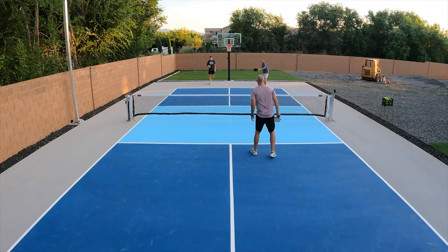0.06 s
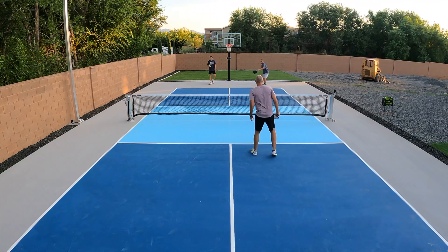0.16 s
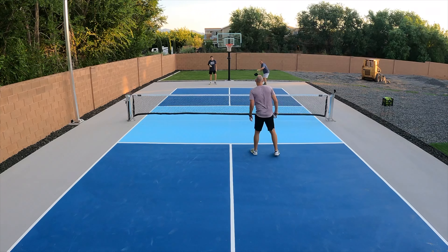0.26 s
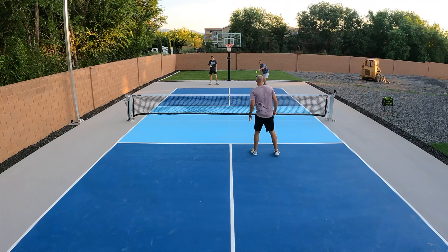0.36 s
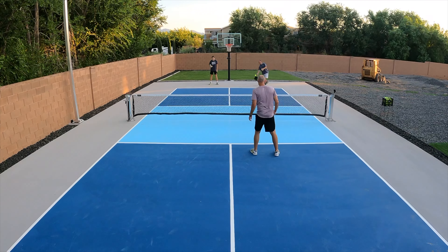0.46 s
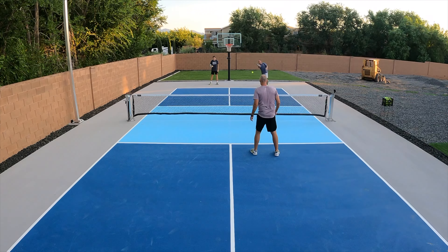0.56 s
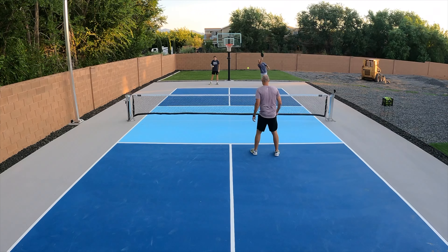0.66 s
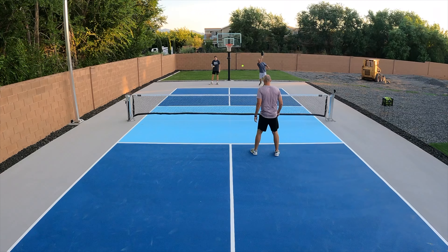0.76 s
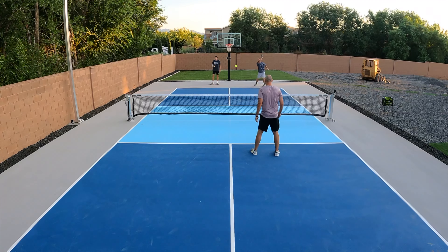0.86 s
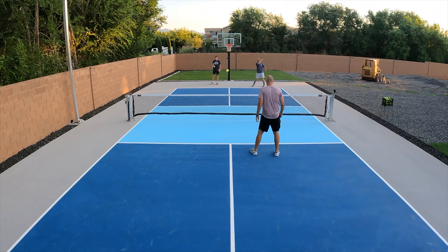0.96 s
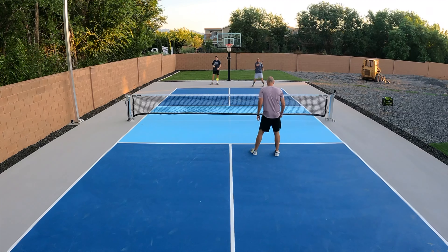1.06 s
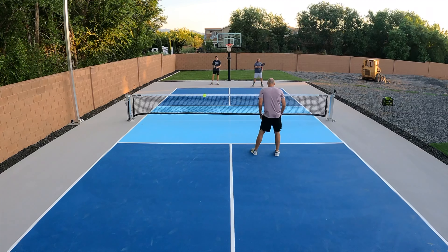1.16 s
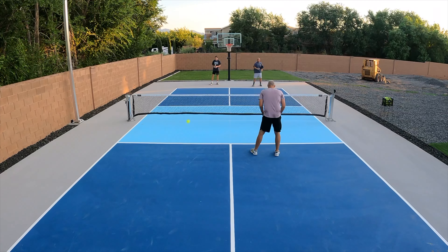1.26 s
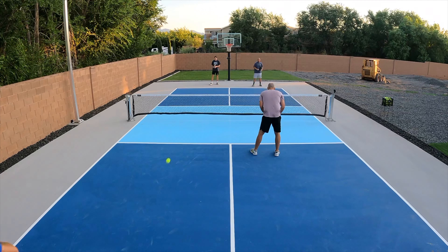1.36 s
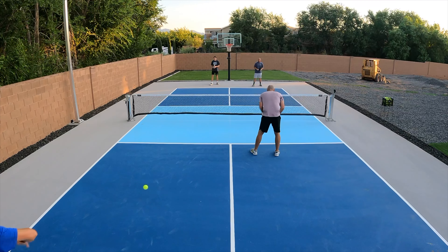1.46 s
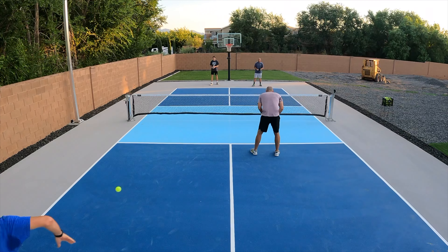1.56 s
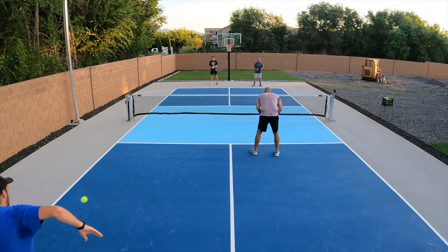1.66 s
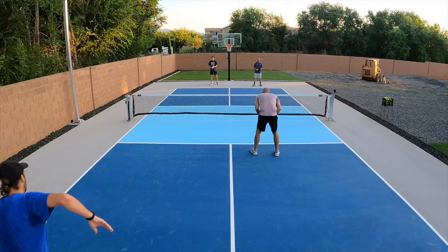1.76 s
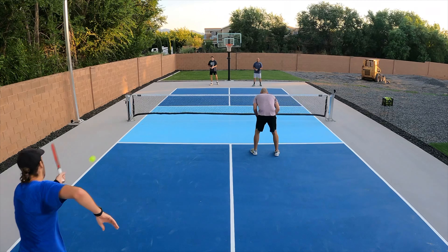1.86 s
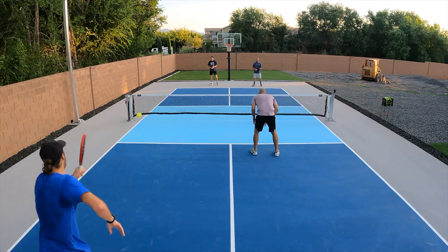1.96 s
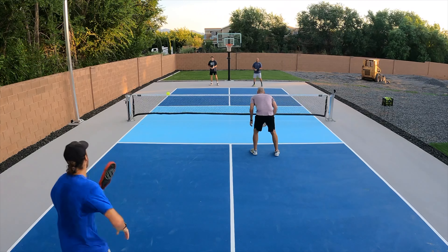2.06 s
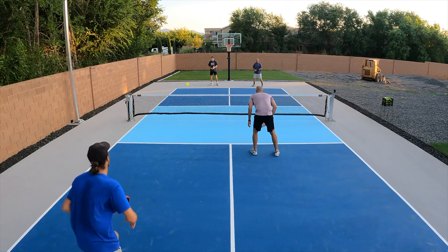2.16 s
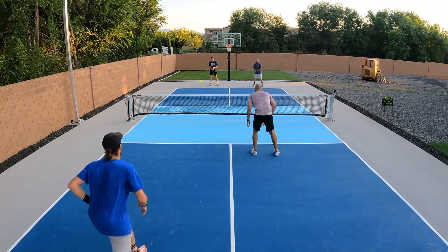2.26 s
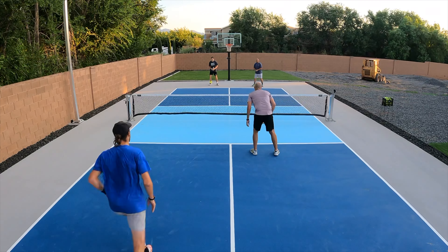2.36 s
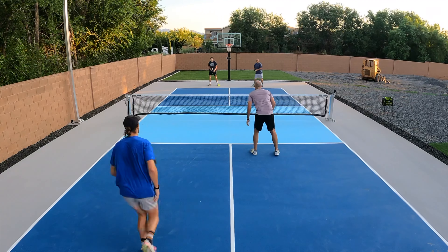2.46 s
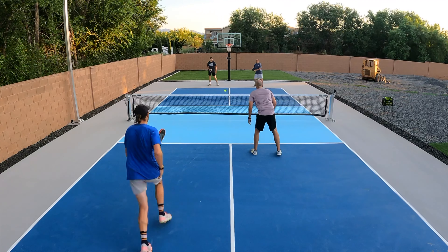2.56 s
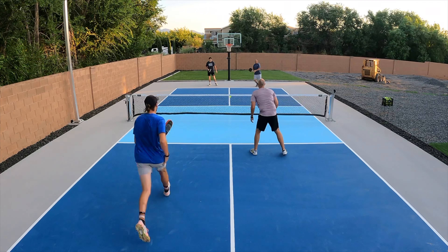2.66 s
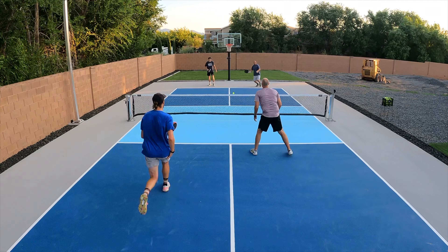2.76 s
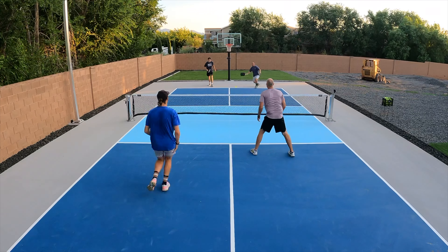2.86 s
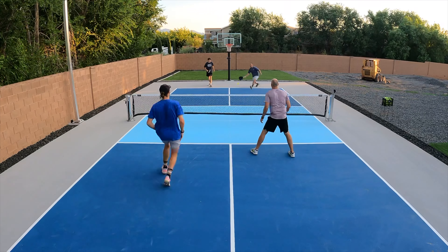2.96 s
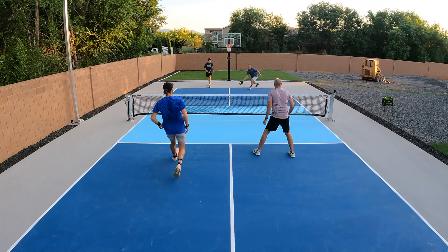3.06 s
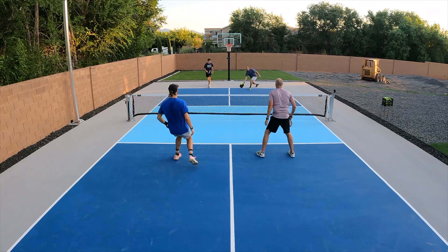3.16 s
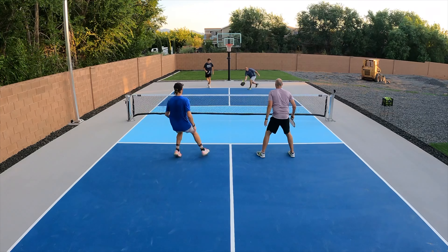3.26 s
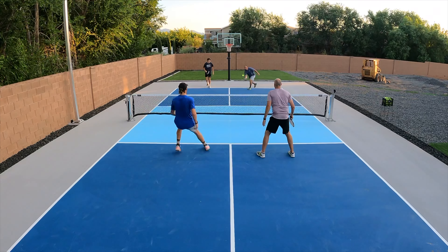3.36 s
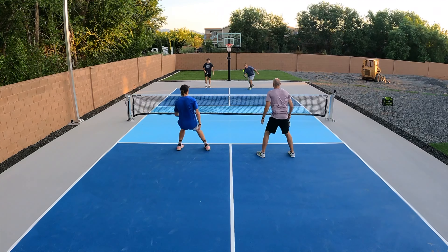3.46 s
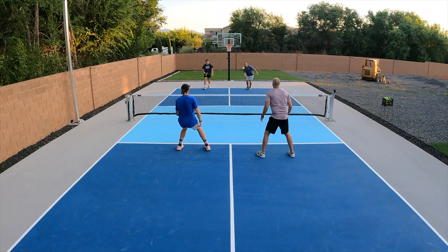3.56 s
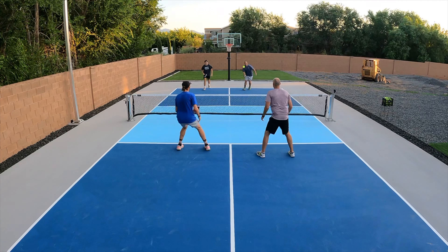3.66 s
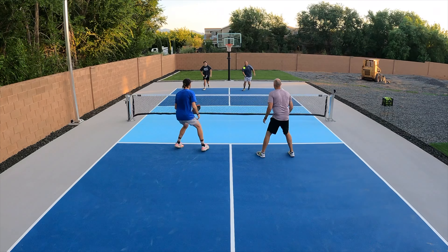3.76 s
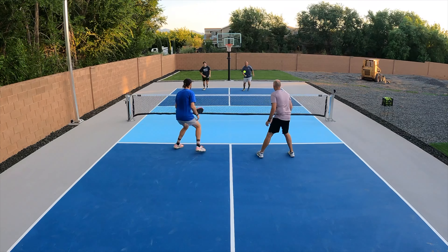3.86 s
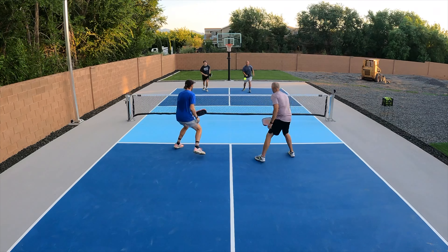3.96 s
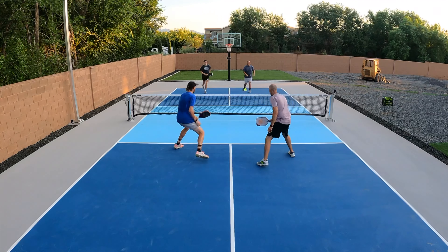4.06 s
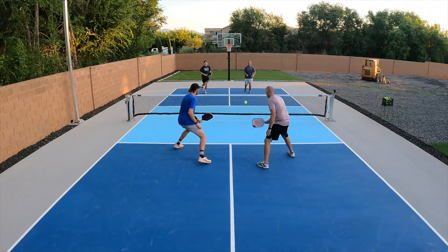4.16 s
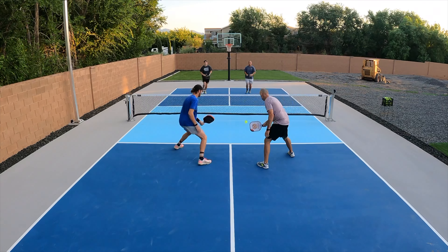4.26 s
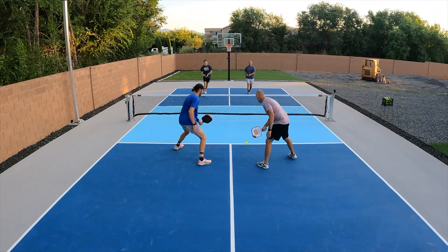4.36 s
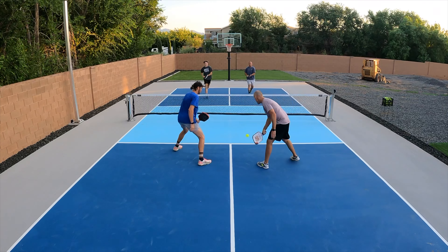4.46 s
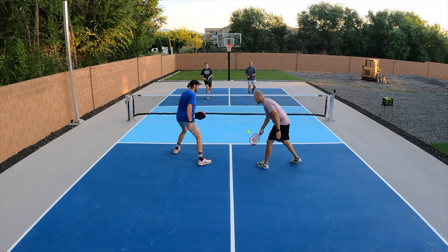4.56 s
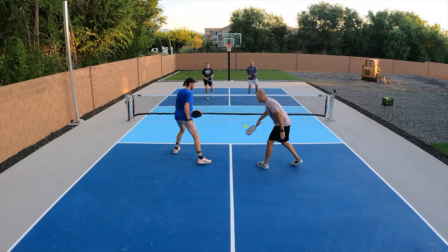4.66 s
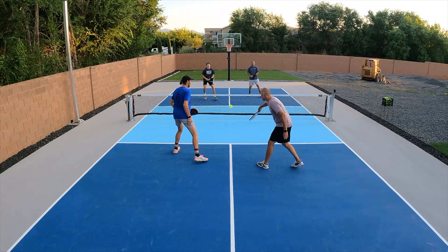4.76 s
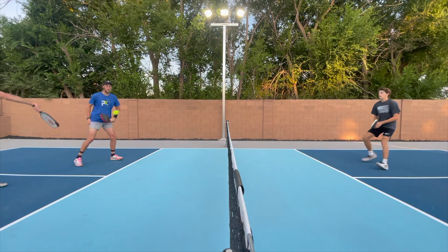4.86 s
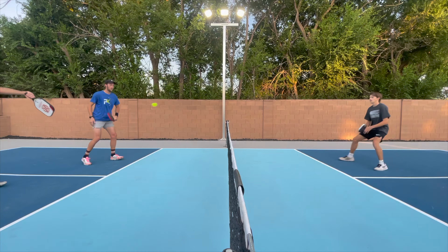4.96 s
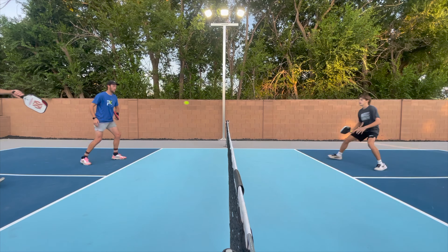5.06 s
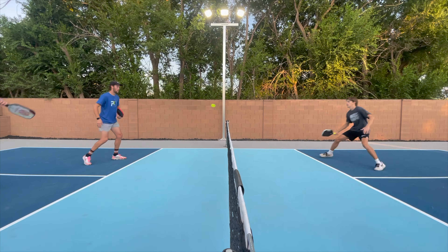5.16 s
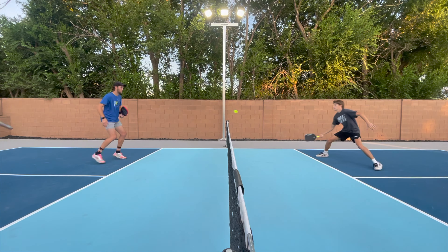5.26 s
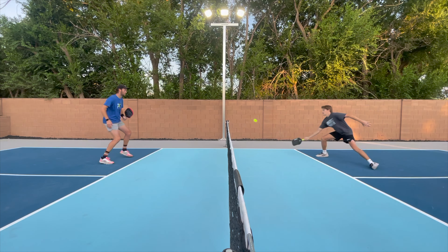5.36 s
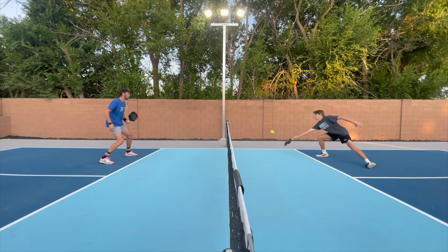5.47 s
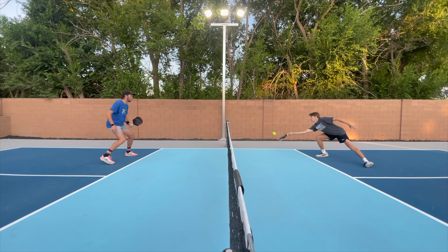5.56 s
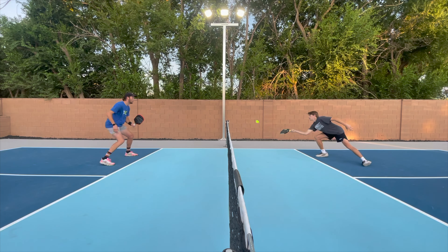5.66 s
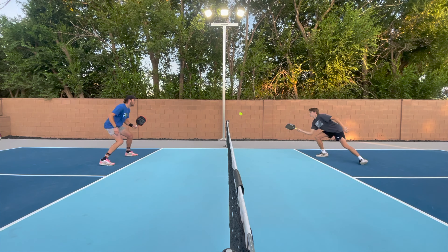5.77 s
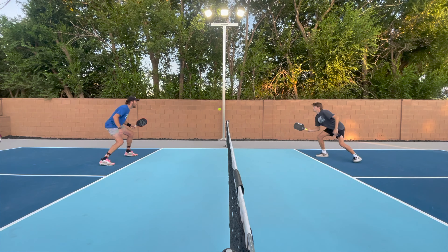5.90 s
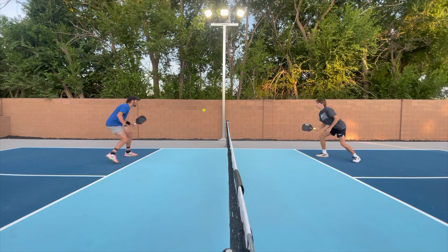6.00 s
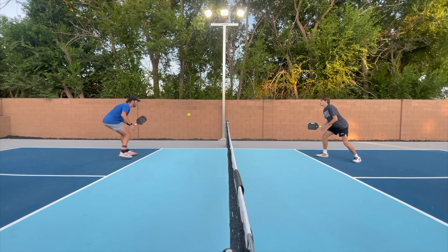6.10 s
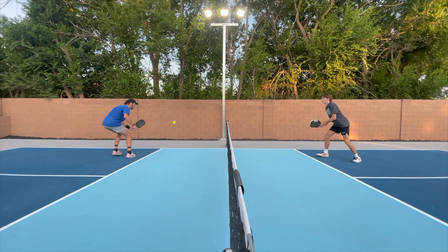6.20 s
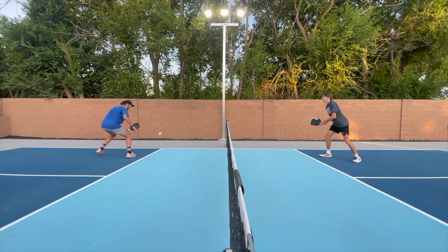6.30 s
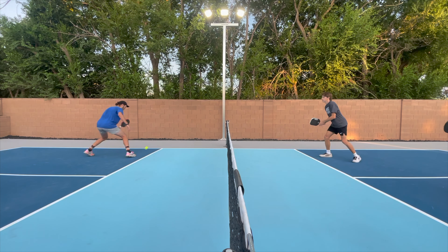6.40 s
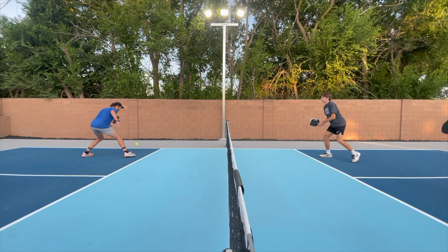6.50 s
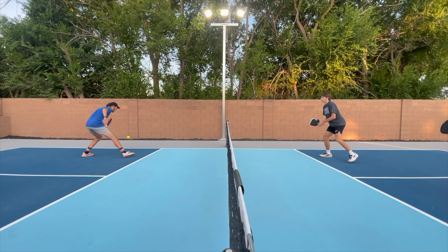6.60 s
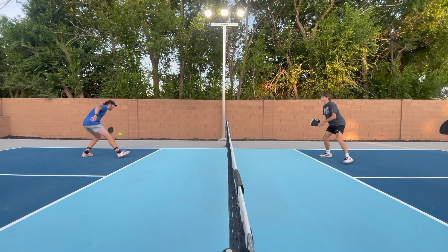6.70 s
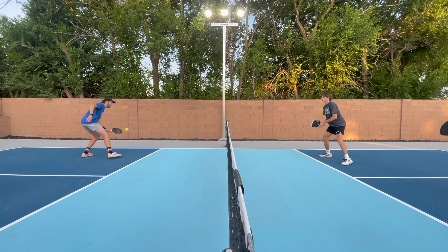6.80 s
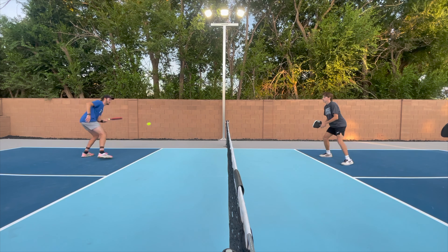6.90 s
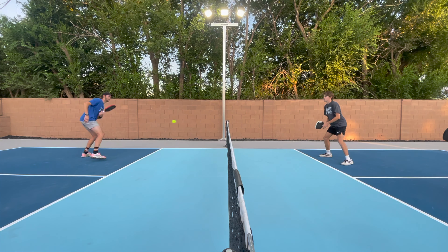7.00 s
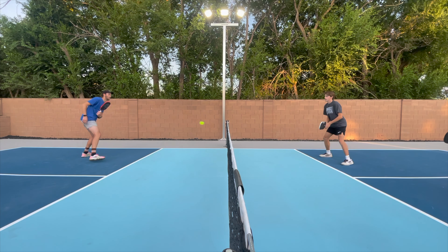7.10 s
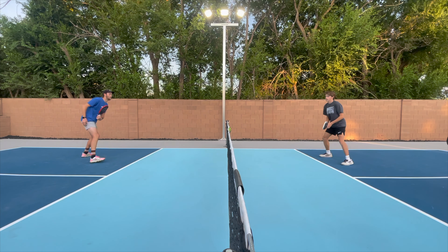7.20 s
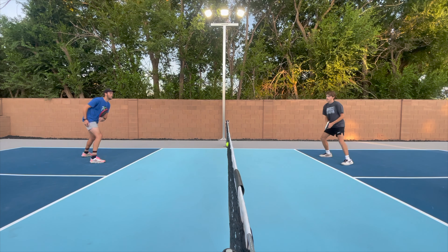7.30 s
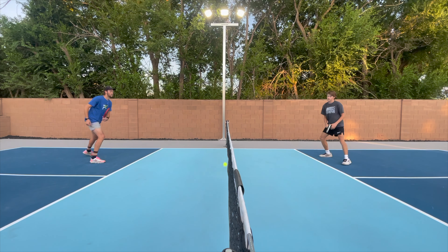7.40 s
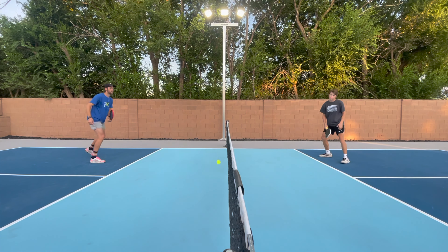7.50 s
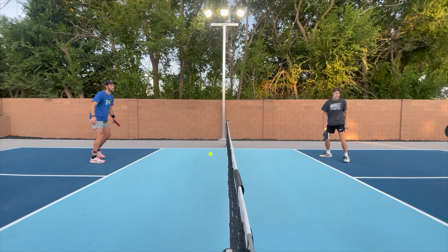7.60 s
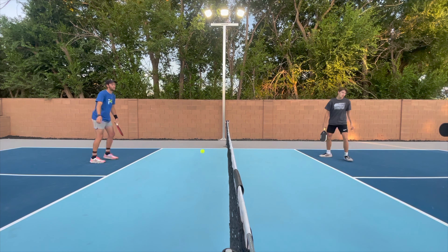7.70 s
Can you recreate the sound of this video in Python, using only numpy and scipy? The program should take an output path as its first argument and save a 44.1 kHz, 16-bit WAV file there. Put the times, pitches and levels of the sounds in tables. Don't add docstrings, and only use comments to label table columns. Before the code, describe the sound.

Hollow plastic ball struck by stiff paddles on a hard court, irregularly spaced: bright pop, dry bounce, very loud crack, later clacks and woodier strikes, ending in small bounces. Rubber soles shuffle, scrape and chirp, most loudly before the final hit. Walls and houses return quick slaps and a short ringing tail. Distant engines hum softly. Courtside stereo pickup, leaning slightly left, with the treble opening up partway through.

```python
import sys
import numpy as np
from scipy import signal
from scipy.fft import rfft, irfft, next_fast_len
from scipy.io import wavfile
from scipy.ndimage import uniform_filter1d

SR = 44100
rng = np.random.default_rng(int(sys.argv[2]) if len(sys.argv) > 2 else 0)


def boost_factor(decibels):
    exponent = np.asarray(decibels, float) / 20
    return 10 ** exponent


def transcribe(u):
    v = np.clip(np.atleast_2d(u).T, -1, 1)
    q = np.round(v * 32767).astype(np.int16)
    wavfile.write(sys.argv[1], SR, q)


N = 341422
CONTACT_S = 0.0007

# (frequency [Hz], level [dB])
SOLE_COLOUR = [(300, 3), (1000, 12.5), (2000, 8), (4000, 6), (7500, -1), (9000, -22), (16000, -69)]
# (frequency [Hz], level [dB])
GRIT_COLOUR = [(6000, -1), (8500, -1), (12500, 1), (14000, 1.5), (16500, 4)]


def evened(x):
    return x / np.sqrt(np.mean(x ** 2) + 1e-20)


def peaked(x):
    return x / (abs(x).max() + 1e-12)


def read(points, hz):
    f, value = np.transpose(points)
    return np.interp(np.log(hz + 1), np.log(f + 1), value)


def add(mix, s, sound):
    part = mix[:, round(s * SR):][:, :sound.shape[1]]
    part += sound[:, :part.shape[1]]


def pair(length, same):
    left, other = rng.standard_normal((2, length))
    return np.array([left, same * left + np.sqrt(1 - same ** 2) * other])


def coloured(x, db):
    size = next_fast_len(x.shape[-1], True)
    hz = np.fft.rfftfreq(size, 1 / SR)
    return irfft(rfft(x, size) * boost_factor(db(hz)), size)[..., :x.shape[-1]]


def toned(x, points):
    return evened(coloured(x, lambda f: read(points, f)))


def resonate(x, hz, width):
    turn = np.exp(2j * np.pi * np.cumsum(hz * np.ones(x.shape[-1])) / SR)
    r = np.exp(-np.pi * width / SR)
    return 2 * (turn * signal.lfilter([1 - r], [1, -r], x / turn)).real


def steep_resonance(x, hz, width):
    return resonate(resonate(x, hz, width), hz, 1.13 * width)


def rally():
    # (time [s], shell ring [dB], shell pitch [Hz], thump re ring [dB], crack re ring [dB])
    strikes = [
        (1.2, -46, 930, 16, -9.5),
        (0.621, -6, 2044, 0, -6),
        (1.8857, -0.5, 1260, -14, -4),
        (2.45, -36.5, 850, 3, -19),
        (4.218, -25.5, 904, 7.5, -18.5),
        (4.7385, -8.5, 936, -5, 3),
        (5.5793, -8.5, 1340, 4, -0.5),
        (6.7895, -6.5, 1550, -5, 0),
        (6.41, -21, 690, 4.5, -31),
        (6.783, -24.5, 1300, 2.5, 3),
    ]
    # (time [s], level [dB], stiffness [x usual bending pitch],
    # thump re level [dB], crack re level [dB])
    clacks = [
        (3.229, -28, 0.98, 7, -17.5),
        (3.344, -8.5, 1.57, 3.5, 0),
        (4.948, -28, 1.1, -1.5, -22),
        (5.5887, -12.5, 1.1, -8.5, 4),
    ]
    # (time [s], level [dB], thump re level [dB], crack re level [dB])
    bounces = [(1.526, -10, -9.5, 1), (2.822, -24, 0.5, 6), (4.451, -18, 3.5, 4), (5.11, -25, -5.5, -13.5),
               (5.351, -18.5, 2, -17), (5.45, -30, 6, -2), (5.558, -19, -1, 1), (6.469, -10, -27.5, -5),
               (7.229, -20.5, -33.5, -2), (7.458, -25, -6, -3), (7.48, -18.5, -22, 0.5)]
    # (time [s], level [dB])
    ticks = [(1.526, -17.5), (4.4507, -9.5), (4.471, -15), (5.5582, -6.5), (5.5704, -29.5), (5.5774, -31),
             (5.657, -28), (5.6695, -27.5), (6.4593, -19), (6.4702, -18), (6.4808, -28), (6.7834, -40),
             (7.208, -28), (7.3981, -37), (7.4572, -17.5), (7.4819, -18), (7.71, -28)]
    ball = np.zeros((2, N))
    for s, *row in strikes:
        add(ball, s + CONTACT_S, knock(*row, focus=0.55, push=direct(ground=0.14)))
    for s, db, stiff, *rest in clacks:
        add(ball, s + CONTACT_S, knock(db, 1460, *rest, focus=0.24, push=direct(ground=0.24), stiff=stiff))
    for s, db, *rest in bounces:
        add(ball, s, knock(db, 1150, *rest, focus=0.064, push=direct(ground=0.12)))
    for s, db in ticks:
        add(ball, s - 64 / SR, tick(db))
    return ball


def knock(ring_db, hz, thump_db, crack_db, focus, push, stiff=1):
    # (frequency [Hz], width [Hz], level [dB])
    shell_modes = [(1000, 77, -8), (1340, 200, -6), (1600, 550, -2), (2026, 280, -18)]
    # (frequency [Hz], width [Hz], level [dB])
    paddle_modes = [(139.7, 63, -6.5), (208.7, 126, -2), (273.6, 138, 3), (418, 168, -3.5),
                    (510.5, 154, -12)]
    # (frequency [Hz], level [dB])
    crack_colour = [(2000, 25.5), (3500, 20), (6000, 17), (9000, 6.5), (12000, -58), (16000, -12.5)]

    near = 0
    for f, width, db in shell_modes:
        away_db = 5.0 * focus * abs(np.log2(f / hz))
        near = near + boost_factor(db - away_db) * peaked(steep_resonance(push, f, width))
    clear = 1.65 * peaked(steep_resonance(push, hz, 213)) + near
    dry_knock = peaked(steep_resonance(push, 1110, 1150))
    shell = focus * clear + (1 - focus) * dry_knock

    bend = push + 3.1 * push.mean(0)
    thump = sum(boost_factor(db) * peaked(steep_resonance(bend, f * stiff, width * stiff))
                for f, width, db in paddle_modes)
    thump = np.roll(thump, round(0.0012 * SR), axis=1)

    rattle = np.where(abs(push) > 0.4, 0, push)
    crack = coloured(push + 2.8 * rattle, lambda f: read(crack_colour, f) - 60 * (f < 1800))
    crack *= signal.windows.tukey(4096, .5)[2048:]
    return -boost_factor(ring_db) * (peaked(shell) + boost_factor(thump_db) * peaked(thump) + boost_factor(crack_db) * peaked(crack))


def direct(ground):
    t = np.arange(2048) / SR
    push = 0.113 * pair(2048, 0.7) * np.exp(-t / 0.0026)
    push[:, 0] += 1
    ground_at = round(0.0036 * SR) + np.array([0, 3])
    push[[0, 1], ground_at] += ground
    return push


def tick(db):
    burst = coloured(np.roll(scattered(0.00073), 64, axis=1), lambda f: read(GRIT_COLOUR, f))
    return boost_factor(db) * peaked(burst * np.hanning(4096)[2048:])


def walls():
    # (time [s], level [dB], shell pitch [Hz], crack re level [dB])
    side_wall = [(0.634, -18, 1050, 7), (0.646, -23, 1100, -12.5), (2.861, -37.5, 788, 5.5),
                 (3.356, -15.5, 1060, 4.5), (3.366, -17.5, 1676, -6), (4.241, -31, 1022, -15),
                 (4.47, -29.5, 1350, 2), (4.758, -24, 950, -4), (5.605, -23, 1310, 1),
                 (6.481, -27.5, 1080, 3), (6.814, -27, 1645, -8), (3.537, -35, 2090, -5)]
    # (time [s], level [dB], shell pitch [Hz], crack re level [dB])
    end_wall = [(0.699, -18.5, 1340, 0.5), (1.544, -26, 930, 1.5), (1.611, -41, 1284, 5),
                (1.905, -14, 1354, -20.5), (2.0365, -13, 1150, -4.5), (2.833, -27, 1170, -1),
                (3.428, -20, 1560, 0.5), (4.871, -21, 1030, -9), (5.685, -21.5, 1410, 1.5),
                (6.803, -12, 1645, -5), (6.922, -27, 1070, -7.5), (7.494, -26, 875, 1)]
    # (time [s], level [dB], shell pitch [Hz])
    houses = [
        (0.861, -30.5, 1080),
        (2.011, -17, 1050),
        (2.058, -17, 1340),
        (2.078, -19.5, 1280),
        (4.806, -28, 980),
        (6.424, -25, 1120),
        (7.243, -35, 1500),
    ]
    # (time [s], frequency [Hz], width [Hz], level [dB])
    pings = [(6.7905, 964, 220, -15), (6.7905, 598, 200, -18), (6.804, 1000, 250, -22),
             (6.811, 300, 200, -14), (4.7395, 1600, 400, -14), (4.7405, 520, 250, -14),
             (4.742, 1500, 500, -15), (4.739, 2800, 1200, -14), (1.8895, 2800, 600, -19),
             (1.887, 250, 150, -13), (3.357, 1700, 300, -21), (3.378, 500, 250, -22),
             (5.581, 1330, 110, -20), (5.581, 1850, 250, -21), (5.59, 2400, 350, -20),
             (5.602, 450, 200, -19), (5.686, 1800, 400, -24), (5.366, 900, 500, -27),
             (7.208, 2300, 1200, -37), (7.229, 3100, 500, -31), (7.229, 1500, 400, -30),
             (7.243, 2450, 400, -37), (7.285, 2200, 800, -41), (7.298, 700, 400, -38),
             (7.459, 2200, 400, -34), (7.481, 2250, 350, -28), (7.495, 2300, 350, -32),
             (3.189, 1200, 800, -30), (0.622, 1150, 300, -11), (0.623, 1550, 400, -14),
             (0.636, 1900, 600, -17), (0.649, 2600, 800, -25), (1.888, 400, 250, -15),
             (4.764, 480, 250, -22), (4.874, 330, 200, -26), (4.898, 350, 200, -28)]
    # (time [s], frequency [Hz], width [Hz], level [dB])
    corners = [(1.932, 1400, 250, -25), (1.946, 2800, 500, -30), (1.983, 1430, 300, -21),
               (1.975, 1000, 200, -25), (2.0375, 2400, 700, -18), (2.06, 2600, 700, -20),
               (2.071, 1350, 250, -17), (2.091, 1150, 300, -17), (2.125, 1350, 250, -27),
               (2.077, 1380, 200, -19), (2.04, 1050, 150, -18), (2.166, 1480, 200, -28),
               (3.429, 1600, 400, -26), (3.429, 3250, 600, -24), (3.429, 5300, 1500, -24),
               (4.807, 1050, 250, -25), (4.811, 1650, 400, -31), (4.847, 1300, 700, -30),
               (4.873, 1800, 400, -30), (4.92, 1000, 200, -34), (4.961, 1450, 350, -29),
               (6.832, 1680, 250, -27), (6.857, 1050, 250, -32), (6.867, 1050, 250, -30),
               (6.862, 450, 200, -28)]
    late = np.zeros((2, N))
    houses = [(*row, -11.5) for row in houses]
    # returns, thump re level [dB], smear [s]
    kinds = ((side_wall, 3.5, 0.0031), (end_wall, -3, 0.0026), (houses, -17.5, 0.0067))
    for rows, thump_db, smear in kinds:
        for s, db, hz, crack_db in rows:
            push = scattered(smear, front=2.9)
            add(late, s + CONTACT_S, knock(db, hz, thump_db, crack_db, focus=0.81, push=push))
    add(late, *flutter())
    for s, *row in pings + corners:
        add(late, s, ping(*row))
    return late


def scattered(smear, front=0):
    push = pair(2048, 0.75) * np.exp(-np.arange(2048) / SR / smear)
    push[:, 0] += front
    return push


def flutter():
    # (time [s], level [dB])
    fading = [
        (1.901, -27),
        (1.906, -29),
        (1.946, -43),
        (2.046, -30),
        (2.144, -42.5),
        (2.588, -65.5),
        (2.6, -67.5),
    ]
    # (frequency [Hz], width [Hz], level [dB])
    ring_modes = [(1000, 83, 3.5), (1340, 170, 2.5), (1458, 270, -2), (2350, 520, -12)]
    s, db = np.transpose(fading)
    t = np.arange(s[0], s[-1], 1 / SR)
    clumps = boost_factor(3.3 * evened(uniform_filter1d(rng.standard_normal(len(t)), size=200)))
    echoes = pair(len(t), 0.74) * clumps
    ring = sum(boost_factor(mode_db) * steep_resonance(echoes, f, width) for f, width, mode_db in ring_modes)
    loudness = boost_factor(np.interp(t, s, db) + 5.0)
    return s[0], loudness * evened(ring) * signal.windows.tukey(len(t), .1)


def ping(hz, width, db):
    push = np.zeros((2, 2048))
    push[[0, 1], [0, 2]] = 1, 0.95
    return boost_factor(db) * peaked(steep_resonance(push, hz, width))


def lingering():
    # (time [s], frequency [Hz], level [dB], time to fall 60 dB [s])
    tones = [(.66, 1038, -43, 0.99), (0.651, 1340, -44, 0.97), (3.461, 4050, -33, 0.15),
             (3.468, 3350, -36, 0.15), (6.235, 2620, -38, 0.4), (6.232, 3850, -38, 0.3),
             (6.24, 5200, -44, 0.4), (6.32, 2550, -38, 0.35), (.72, 2050, -45, .6), (.73, 1400, -45, .6),
             (.72, 1750, -47, .6), (.66, 450, -39, .7), (.74, 2600, -46, .4), (5.375, 2960, -38, .3),
             (5.6, 1330, -38, .3), (5.6, 1900, -40, .5), (6.82, 330, -37, .6), (3.45, 1500, -40, .4),
             (4.75, 1750, -41, .5), (4.76, 450, -40, .8), (6.82, 620, -41, .6), (6.33, 2800, -42, .3),
             (6.25, 2350, -43, .4), (4.744, 985, -38, 0.6), (6.82, 1720, -46, 1.1), (6.8, 1000, -41.5, 1),
             (6.801, 476, -36, 0.55)]
    hanging = np.zeros((2, N))
    for s, *row in tones:
        add(hanging, s, linger(*row))
    return hanging


def linger(hz, db, t60):
    t = np.arange(round(.5 * SR)) / SR
    ring = evened(steep_resonance(pair(len(t), 0.78), hz, 0.13 * hz))
    return boost_factor(db - 60 * t / t60) * ring * np.clip(t / 0.0069, 0, 1)


def yard(x):
    # (frequency [Hz], time to fall 60 dB [s])
    dying = [(100, 0.048), (500, 0.89), (1000, 0.82), (1800, 0.84), (3000, 0.6), (8000, 0.36),
             (15000, 0.14)]
    # (frequency [Hz], level [dB])
    tail_colour = [(200, -1.5), (700, -1.5), (1000, -3), (1800, -3), (3000, -1.5), (12000, 9.5)]
    taps = np.zeros((2, SR))
    slots = np.arange(560, SR - 40, 30)
    at = slots + rng.integers(0, 30, (2, len(slots)))
    np.put_along_axis(taps, at, rng.choice([-1., 1.], at.shape), 1)
    taps = taps + 0.4 * taps[::-1]
    hz, t, z = signal.stft(taps, SR, nperseg=256)
    fall_db = read(tail_colour, hz)[:, None] - 60 * t / read(dying, hz)[:, None]
    tail = signal.istft(z * boost_factor(fall_db), SR, nperseg=256)[1]
    return signal.fftconvolve(x, tail / np.linalg.norm(tail[0]), axes=1)[:, :N]


def footwork():
    # (time [s], level [dB], centre [Hz], grit re centre [dB], length [s])
    scuffs = [(0.279, -43, 3400, -12, 0.057), (0.3, -45, 1500, -30, 0.045), (0.09, -52, 1450, -30, 0.1),
              (0.45, -52, 1450, -30, 0.08), (5.69, -52, 5000, -1, 0.2), (1.555, -37, 4030, -15, 0.024),
              (3.168, -34.5, 2680, -23, 0.21), (3.458, -44, 3000, -30, 0.032),
              (3.538, -33, 3470, -14, 0.055), (3.808, -41.5, 3580, -35, 0.11),
              (4.115, -32.5, 3940, -15.5, 0.14), (4.502, -40.5, 3780, -12, 0.27),
              (4.889, -35.5, 4200, -10, 0.091), (5.234, -36.5, 4160, -13, 0.013),
              (5.349, -32, 3400, -19, 0.05), (5.449, -35, 3500, -33, 0.033), (6.066, -41, 2300, -33, 0.042),
              (6.181, -28, 3660, -37.5, 0.049), (6.326, -41.5, 4550, -33.5, 0.065)]
    # (time [s], level [dB], length [s])
    steps = [(0.148, -56, 0.081), (0.421, -44, 0.14), (0.928, -49.5, 0.081), (1.313, -44, 0.15),
             (1.693, -52, 0.089), (2.186, -47.5, 0.089), (2.304, -51, 0.0183), (2.561, -48.5, 0.037),
             (2.957, -48, 0.0436), (3.117, -48, 0.0173), (3.731, -47, 0.041), (7.3, -50.5, 0.31),
             (7.611, -63, 0.089)]
    # (time [s], level [dB], length [s])
    dusty_steps = [
        (0.551, -50.5, 0.22),
        (1.056, -49, 0.039),
        (2.366, -56.5, 0.099),
        (2.645, -54, 0.079),
        (4.365, -45.5, 0.16),
        (5.114, -48.5, 0.191),
        (5.897, -47, 0.12),
        (6.654, -55.5, 0.063),
        (7.685, -46, 0.1),
    ]
    # (time [s], length [s], level [dB], strongest partial from [Hz], to [Hz])
    squeaks = [
        (2.21, 0.052, -38, 2950, 2660),
        (3.222, 0.073, -31.5, 2330, 2257),
        (3.456, .022, -28, 3800, 3345),
        (4.138, .056, -25, 3840, 2280),
        (5.11, 0.17, -46, 6900, 6730),
    ]
    # (time [s], length [s], level [dB], from [Hz], to [Hz])
    squeals = [
        (6.2, 0.045, -22, 2600, 2510),
    ]
    # (time [s], length [s], level [dB], from [Hz], to [Hz])
    chirps = [
        (5.351, 0.06, -35, 3300, 2950),
        (6.069, 0.066, -36, 1955, 1600),
    ]
    # (peak at [share of length], start [dB], end [dB],
    # glide done at [share of length], overtones [dB], jitter [share of pitch])
    swelling = (.5, -16, -18.5, 0.8, -15, 0.07)
    breaking = (.3, -5, -12, 0.6, -4, 0.025)
    chirping = (0.26, 2, -31, 0.8, -22, 0.26)
    # (time [s], frequency [Hz], width [Hz], level [dB])
    slips = [(6.194, 2390, 260, -7), (6.195, 3000, 400, -14), (6.196, 5400, 600, -15),
             (6.203, 2550, 350, -15), (6.206, 5100, 400, -18), (6.205, 3750, 300, -18),
             (6.213, 2720, 200, -17), (6.219, 3850, 350, -17), (6.224, 3650, 350, -19),
             (6.222, 6500, 400, -24), (3.466, 3350, 190, -18), (3.464, 4100, 300, -23),
             (3.458, 3800, 400, -26), (4.116, 3850, 90, -35), (4.159, 3050, 300, -21),
             (4.169, 2500, 400, -19), (4.176, 2300, 250, -21), (4.2, 2300, 200, -29),
             (4.336, 2950, 200, -37), (4.27, 2200, 1500, -35), (4.279, 1900, 1200, -35),
             (6.325, 2400, 250, -29), (5.351, 3250, 300, -21), (5.36, 3000, 200, -23),
             (5.373, 2950, 150, -26), (6.071, 1950, 250, -28), (6.079, 1600, 250, -30),
             (6.095, 1900, 200, -32), (6.108, 1700, 200, -33), (3.245, 2300, 150, -27),
             (3.258, 2280, 200, -25), (3.28, 1650, 200, -32), (6.219, 5050, 350, -21),
             (6.335, 3900, 200, -33)]
    feet = np.zeros((2, N))
    for s, *row in scuffs:
        add(feet, s, scuff(*row))
    for rows, hz, grit_db in ((steps, 3840, -25), (dusty_steps, 5200, -4.5)):
        for s, db, length in rows:
            add(feet, s, scuff(db, hz, grit_db, length))
    for rows, kind in ((squeaks, swelling), (squeals, breaking), (chirps, chirping)):
        for s, *row in rows:
            add(feet, s, squeak(*row, kind))
    for s, *row in slips:
        add(feet, s, ping(*row))
    return feet


def scuff(db, hz, grit_db, length):
    t = np.arange(round((length + 0.09) * SR)) / SR
    landing = np.clip(t / 0.00066, 0, 1)
    swell = 0.6 + 0.43 * np.sin(np.pi * np.clip(t / length, 0, 1))
    dying = np.exp(-np.maximum(t - 0.55 * length, 0) / 0.019)
    grain = boost_factor(1.86 * evened(uniform_filter1d(rng.standard_normal(len(t)), size=90)))
    noise = pair(len(t), 0.71) * grain
    body = coloured(noise, lambda f: -7.0 * abs(np.log2((f + 1) / hz)) + .5 * read(SOLE_COLOUR, f))
    grit = toned(noise, GRIT_COLOUR)
    return boost_factor(db) * landing * swell * dying * (evened(body) + boost_factor(grit_db) * grit)


def squeak(length, peak_db, from_hz, to_hz, kind):
    top, start_db, end_db, settled, over_db, uneven = kind
    t = np.arange(0, length, 1 / SR)
    db = peak_db + np.interp(t / length, [0, top, 1], [start_db, 0, end_db])
    hz = np.interp(t / length, [0, settled], [from_hz, to_hz])
    jitter = uneven * evened(uniform_filter1d(rng.standard_normal(len(t)), size=60))
    slip_phase = np.pi * np.cumsum(hz * (1 + jitter)) / SR
    grip = [.85 + .6 * evened(uniform_filter1d(pair(len(t), .75), size=110)) for k in range(4)]
    main = grip[0] * np.cos(2 * slip_phase)
    over = sum(boost_factor(-3.0 * k ** 2) * grip[k + 1] * np.cos((3 + k) * slip_phase) for k in range(3))
    return boost_factor(db + 4.0) * (main + boost_factor(over_db) * over) * signal.windows.tukey(len(t), .1)


def shuffle():
    # (time [s], level [dB])
    busy = [(0.0, -55), (0.32, -54), (0.58, -52.5), (0.77, -49), (0.99, -53), (1.94, -57.5), (2.07, -47.5),
            (2.43, -56), (3.19, -53), (3.38, -41), (3.6, -48), (4.07, -56), (4.4, -47), (4.98, -49),
            (5.5, -42.5), (6.32, -52), (7.24, -58.5), (7.46, -49), (7.6, -51.5)]
    s, db = np.transpose(busy)
    rub = field(3.6)
    loudness = boost_factor(np.interp(np.arange(N) / SR, s, db))
    return loudness * (toned(rub, SOLE_COLOUR) + boost_factor(-14) * toned(rub, GRIT_COLOUR))


def field(patchy_db):
    # (frequency [Hz], likeness [0-1])
    likeness = [(60, 0.94), (180, 1), (550, 0.73), (1650, 0.49), (4970, 0.65), (15000, 0.28)]
    frames, hz = N // 128 + 5, np.fft.rfftfreq(512, 1 / SR)
    a, b, c, d, patches = rng.standard_normal((frames, 257, 5), dtype=np.float32).T
    patches = uniform_filter1d(patches, size=30, axis=0)
    patches = evened(uniform_filter1d(patches, size=8, axis=1))
    same = read(likeness, hz)[:, None]
    left, other = a + 1j * b, c + 1j * d
    right = same * left + np.sqrt(1 - same ** 2) * other
    z = np.array([left, right]) * boost_factor(patchy_db * patches)
    return signal.istft(z, nperseg=512, noverlap=384)[1][:, :N]


def traffic():
    # (frequency [Hz], level [dB per Hz])
    air_colour = [(12, -43.5), (20, -9), (76, -2), (105, -10.5), (129, -4.5), (210, -14), (419, -20.5),
                  (835, -29.5), (1020, -26.5), (1290, -26.5), (5000, -44), (7340, -54), (9000, -53.5),
                  (11700, -75), (19800, -120)]
    # (frequency [Hz], level [dB])
    hum = [
        (80, -46),
        (101, -46.5),
        (120, -45.5),
    ]
    # (time [s], length [s], level [dB], from [Hz], to [Hz])
    surges = [(0, 0.59, -39, 92.6, 94.6), (.95, 0.74, -34.5, 70.2, 73.6),
              (1.049, 0.64, -34.5, 106.5, 109.4), (2.15, 0.35, -38, 101.6, 102),
              (2.652, 0.57, -33.5, 102.1, 101.6), (3.553, 0.53, -31.5, 99.9, 102.4),
              (3.5, 0.81, -38, 125.4, 118.9), (3.898, 2.07, -33, 72, 64.4), (5.1, 0.55, -35, 101.2, 101.2),
              (5.9, 0.86, -34.5, 101.1, 100.2), (7.098, 0.75, -37.5, 100.1, 101.3),
              (5.398, 0.68, -35, 78.6, 79.1)]
    far = boost_factor(-40.5) * toned(field(2.32), air_colour)
    far = far + sum(drone(*row) for row in hum)
    for s, *row in surges:
        add(far, s, surge(*row))
    return far


def surge(length, db, from_hz, to_hz):
    u = np.arange(0, length, 1 / SR) / length
    turns = np.cumsum(from_hz + (to_hz - from_hz) * u) / SR + rng.random()
    note = np.sin(np.pi * u) ** 1.06 * np.sin(2 * np.pi * turns)
    return boost_factor(db) * note * np.ones((2, 1))


def drone(hz, db):
    noise = rng.standard_normal(N)
    return boost_factor(db) * evened(coloured(noise, lambda f: -20 * np.log10(1 + ((f - hz) / 3.15) ** 2)))


def scene():
    ball, late, feet = rally(), walls(), footwork()
    to_yard = boost_factor(-13.5) * ball + boost_factor(-15.0) * late + boost_factor(-17.0) * feet
    court = ball + late + feet + yard(to_yard) + shuffle() + lingering()
    balance = boost_factor(np.array([[.5], [-.5]]))
    return court * balance + traffic()


def roll_off(x):
    return signal.sosfilt(signal.butter(12, 15900, fs=SR, output="sos"), x)


def record(dry):
    # (frequency [Hz], level [dB])
    dull_top = [(11000, 0.5), (13000, -6), (14000, -15), (17000, -43)]
    # (frequency [Hz], level [dB])
    open_top = [(14000, 0), (15500, -15), (16300, -20), (17000, -62)]
    dull = coloured(dry, lambda f: read(dull_top, f))
    bright = coloured(dry, lambda f: read(open_top, f))
    heard = np.where(np.arange(N) < 4.86 * SR, dull, bright)
    return roll_off(np.clip(heard, -1, 1))


dry = scene()
out = record(dry)
transcribe(out)
```